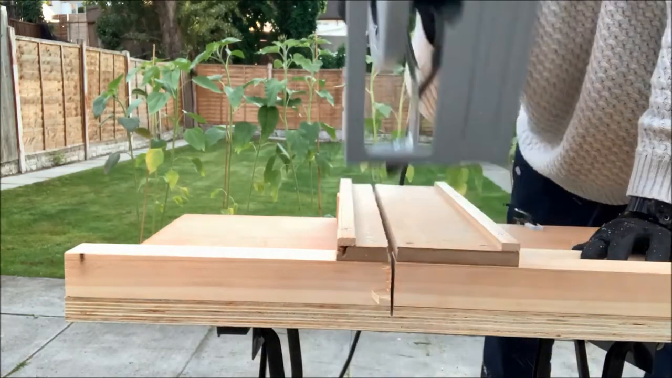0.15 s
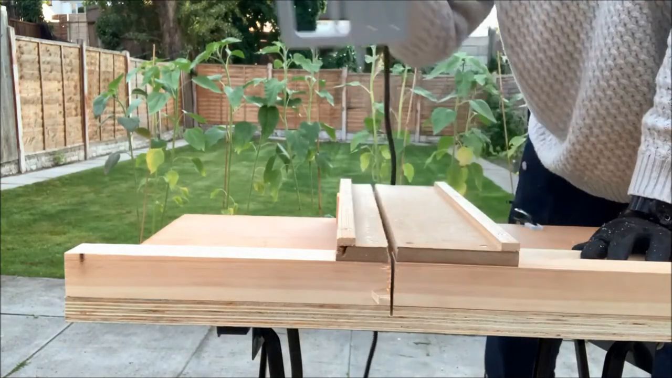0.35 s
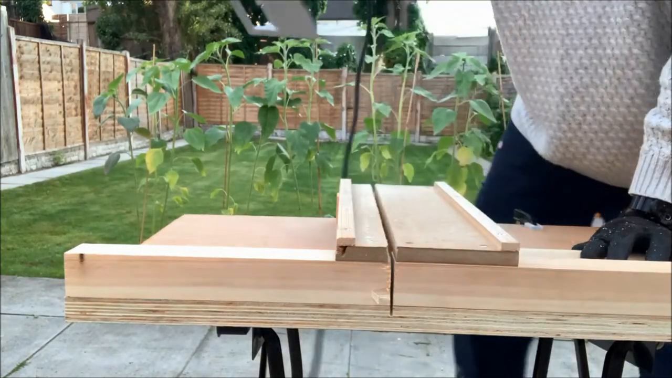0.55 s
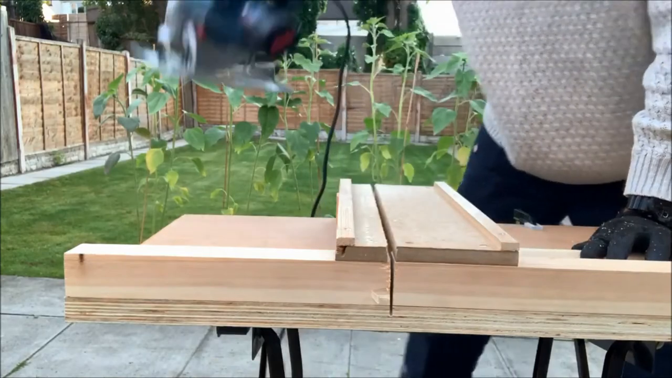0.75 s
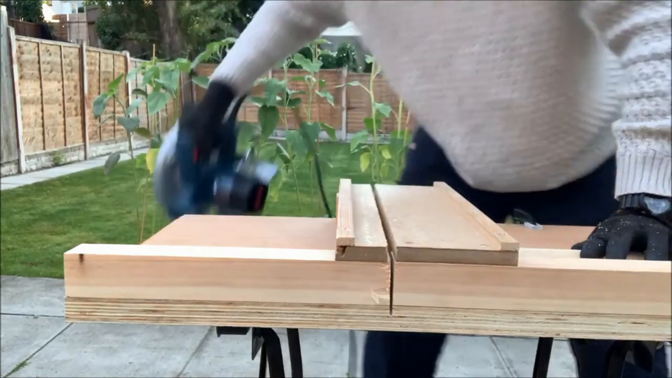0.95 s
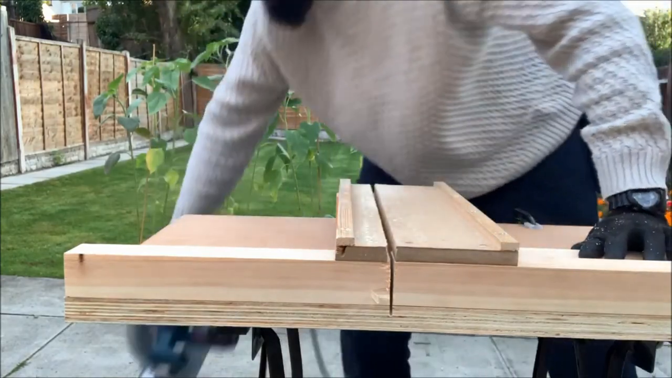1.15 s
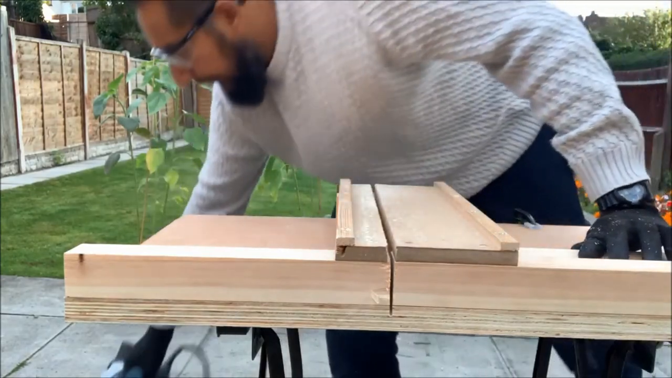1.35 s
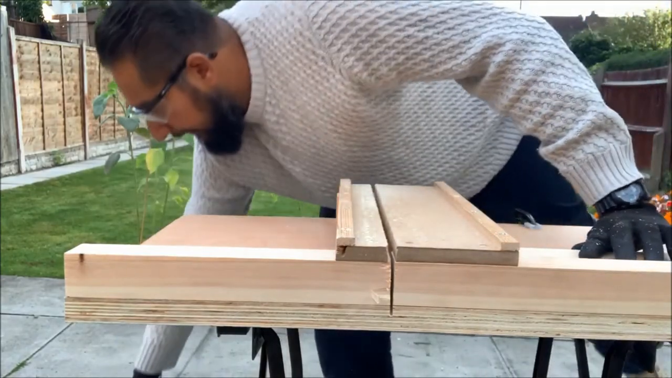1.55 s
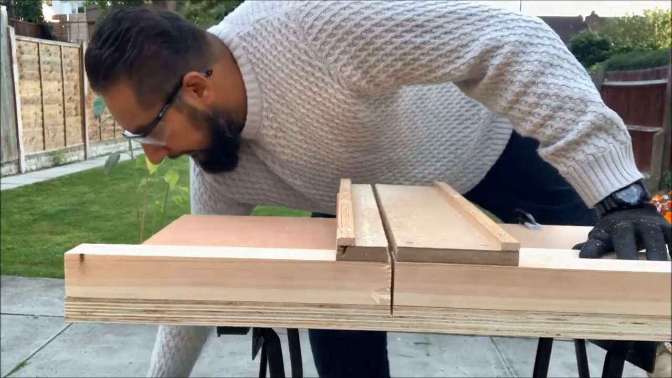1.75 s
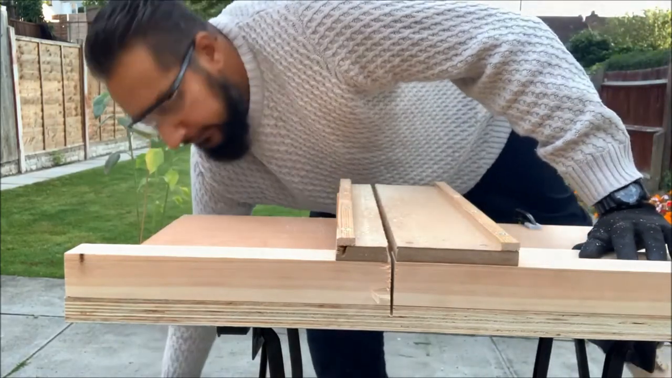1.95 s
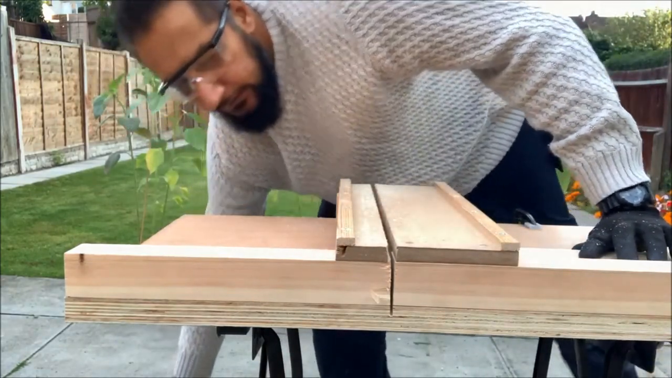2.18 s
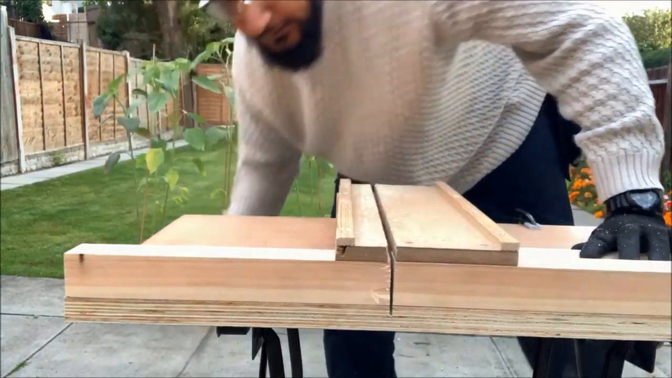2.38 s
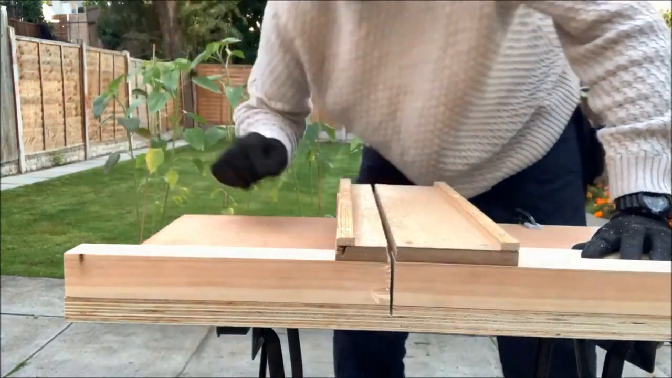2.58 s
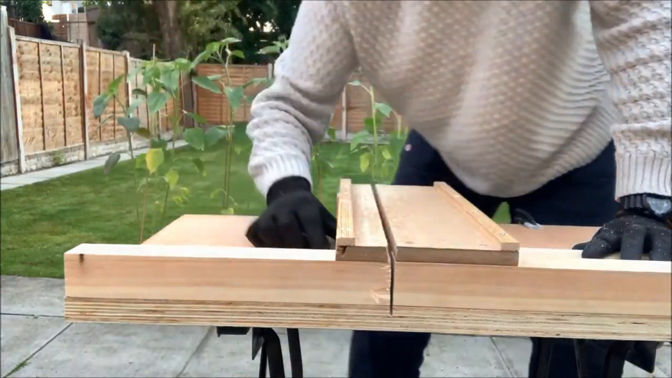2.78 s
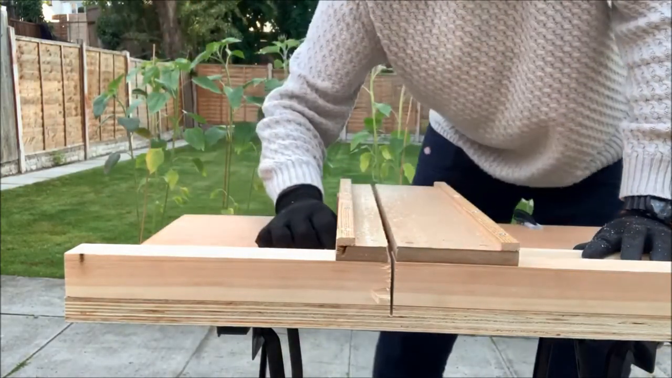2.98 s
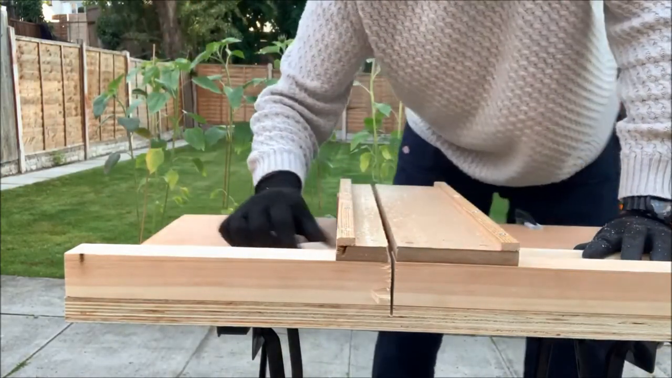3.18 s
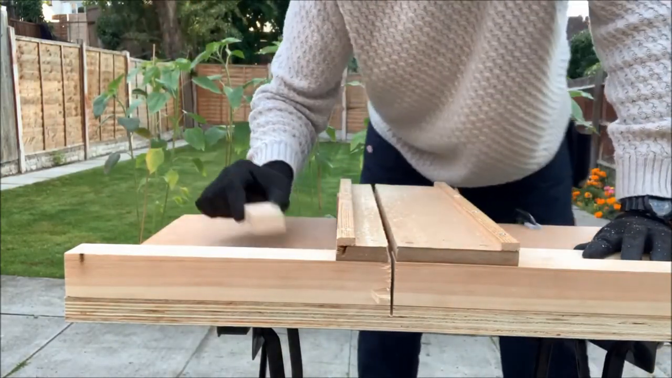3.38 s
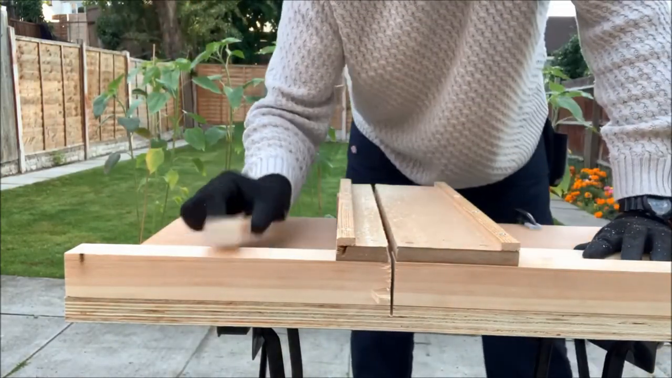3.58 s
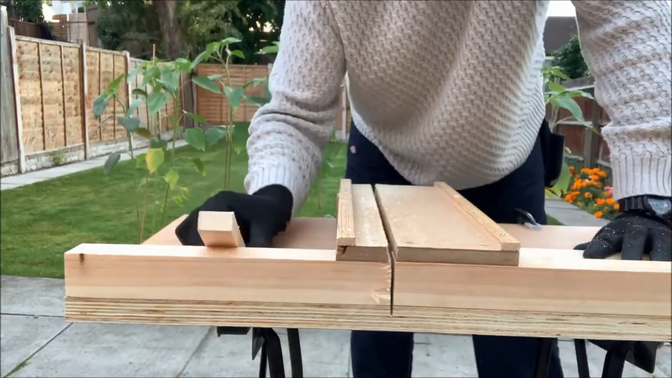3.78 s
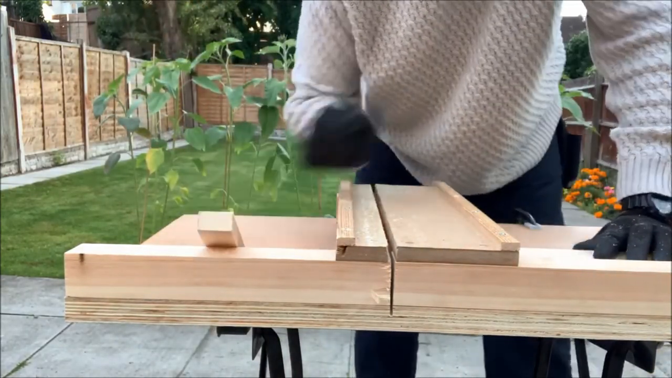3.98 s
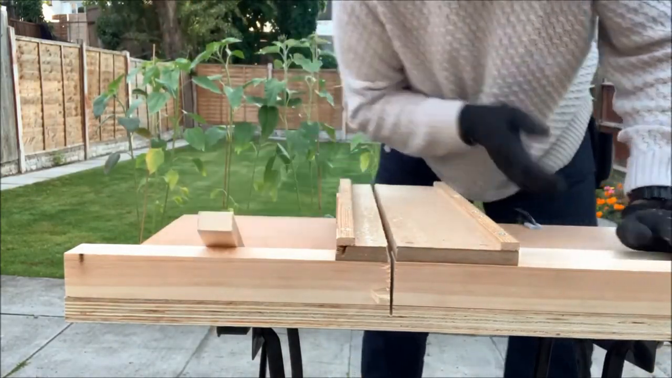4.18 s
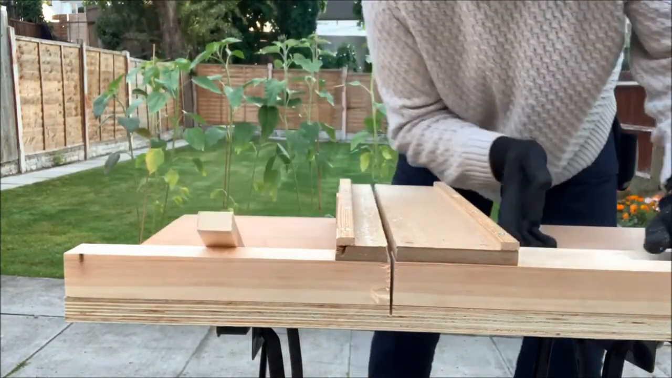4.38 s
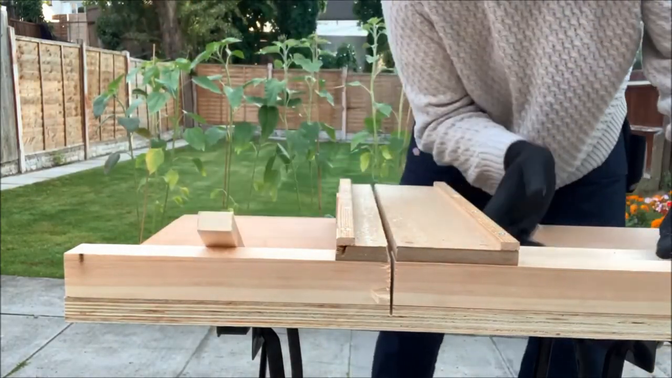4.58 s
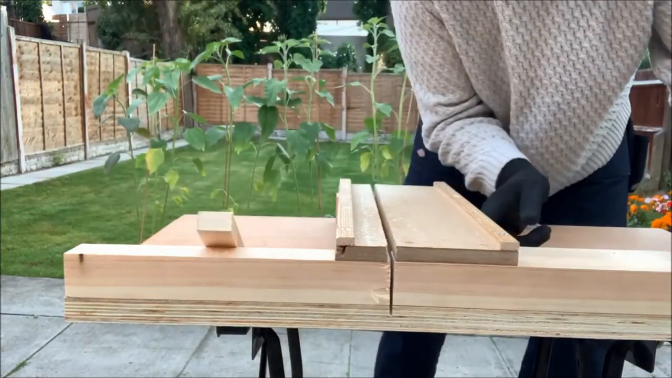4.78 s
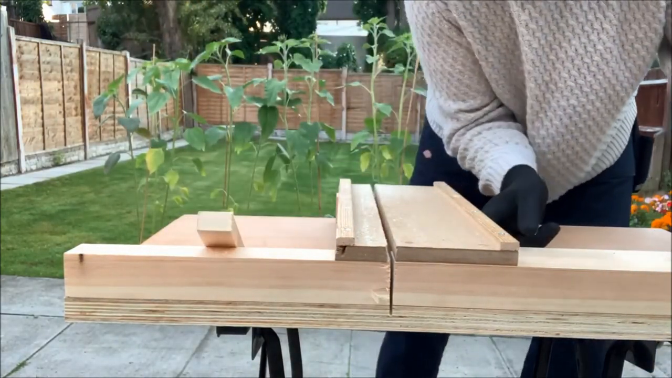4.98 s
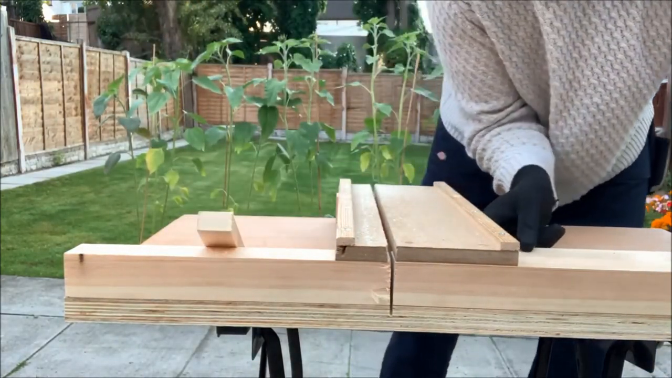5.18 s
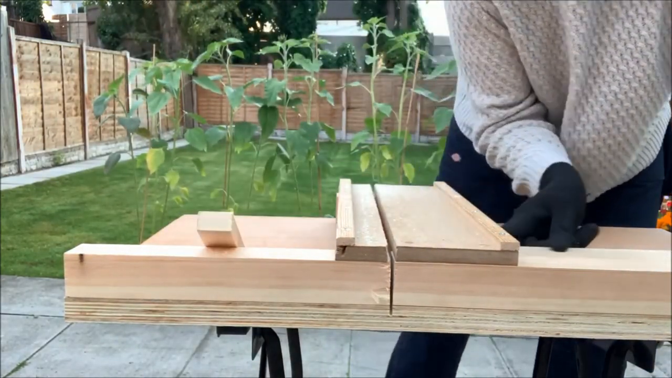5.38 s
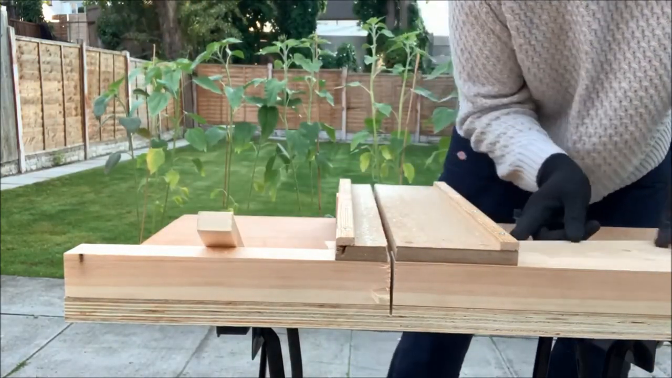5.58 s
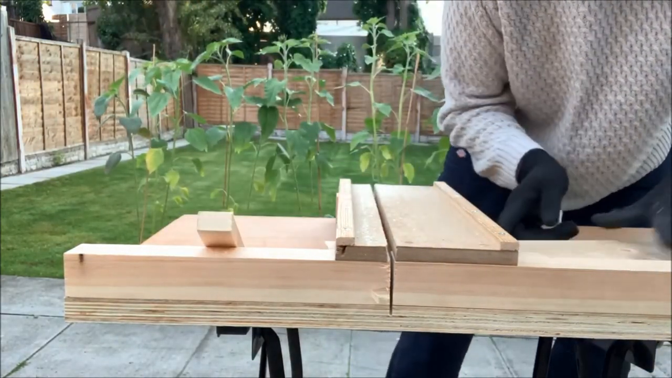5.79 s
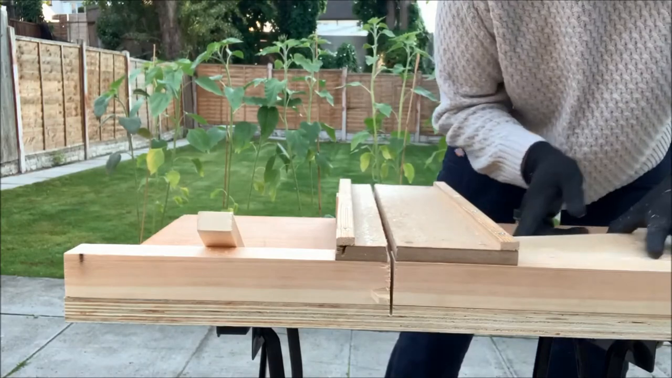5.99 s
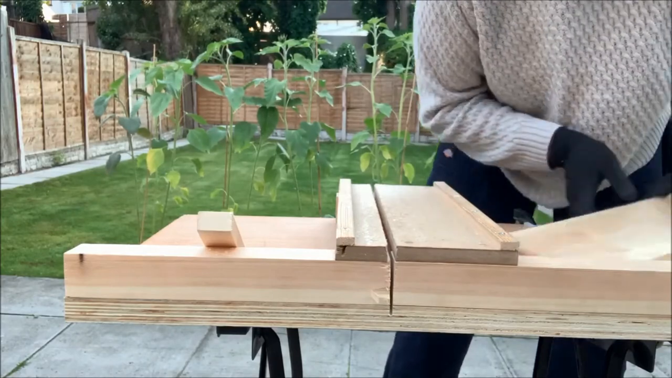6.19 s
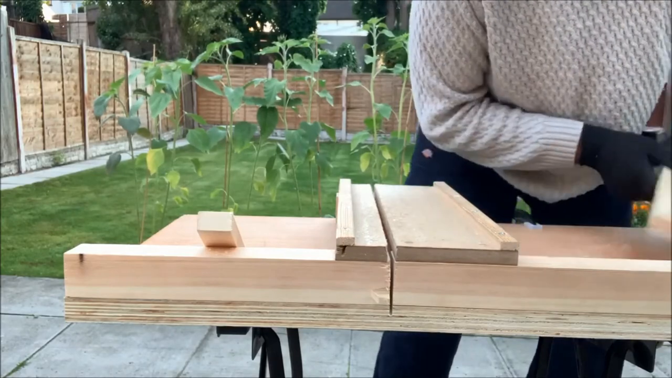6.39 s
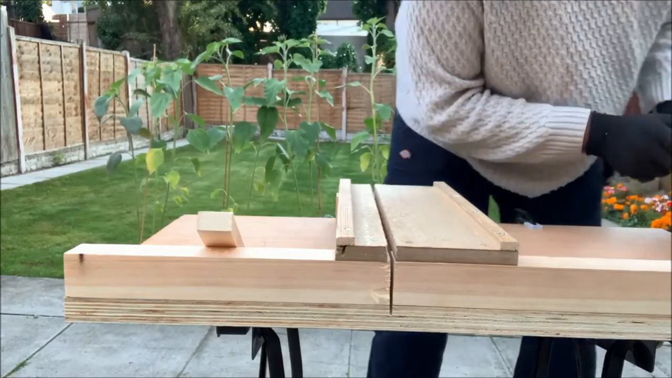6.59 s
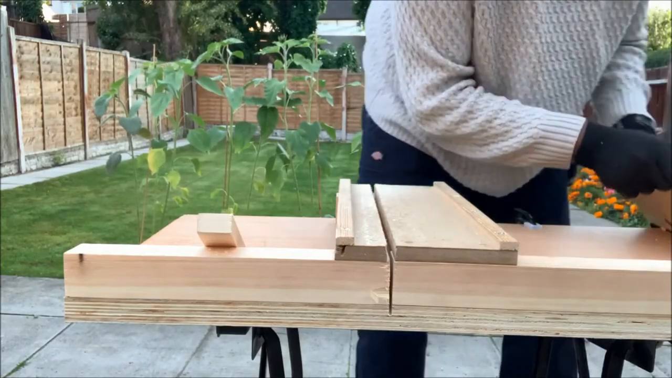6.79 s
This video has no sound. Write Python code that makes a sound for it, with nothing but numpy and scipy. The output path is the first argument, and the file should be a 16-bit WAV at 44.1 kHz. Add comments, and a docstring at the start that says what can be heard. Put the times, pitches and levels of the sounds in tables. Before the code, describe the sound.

A power saw spins down from a loud whine, clacks onto stone, leaves its blade faintly ringing, and sharp wood knocks follow outdoors.

```python
"""The roar and whine of a hand-held circular saw fall as it coasts to a stop in a garden.
It is set down on paving with clacks and thumps, and its blade sings on as beating, decaying disc modes.
Gloved hands brush over a bench as shaped noise; wood slides and knocks there as struck and rubbed modes.
A distant engine drones as a wavering tone over faint air; two microphone ports differ in lag, phase and level."""
import sys
import numpy as np
from scipy import signal
from scipy.fft import rfft, irfft
from scipy.io import wavfile
from scipy.ndimage import uniform_filter1d, map_coordinates

SR = 44100
rng = np.random.default_rng(int(sys.argv[2]) if len(sys.argv) > 2 else 0)


def wrap_up_sound(samples):
    """Save the sound to the file named by the first command line argument, as 16-bit audio."""
    columns = np.atleast_2d(samples).T
    # keep every value between -1 and 1, then stretch to whole-number steps
    tamed = np.clip(columns, -1, 1)
    steps = np.round(tamed * 32767).astype(np.int16)
    wavfile.write(sys.argv[1], SR, steps)


N = 302085
TIME = np.arange(N) / SR


def gain_of(db):
    """Decibel law: 20 dB is a tenfold amplitude."""
    return 10 ** (np.asarray(db) / 20)


def evened(x):
    """Normalization to unit rms."""
    return x / np.sqrt(np.mean(x ** 2) + 1e-20)


def read(points, hz):
    """Interpolation along a logarithmic frequency axis."""
    f, *values = np.transpose(points)
    return np.squeeze([np.interp(np.log(hz + 1), np.log(f + 1), v) for v in values])


def follow(rows, t):
    """Linear interpolation in time."""
    s, *columns = np.transpose(rows)
    return np.squeeze([np.interp(t, s, c) for c in columns])


def add(mix, s, sound):
    """Superposition of a sound that starts at s seconds."""
    part = mix[round(s * SR):][:len(sound)]
    part += sound[:len(part)]


def wander(hz):
    """Low-pass noise: a slow random fluctuation of rms 1."""
    noise = uniform_filter1d(rng.standard_normal(N), 200)
    return evened(signal.lfilter([1], [1, -np.exp(-2 * np.pi * hz / SR)], noise))


def frames():
    """Short-time analysis: frame times in seconds, 128 samples apart."""
    return np.arange(N // 128 + 5) * 128 / SR


def colour(points, peaks, hz):
    """Source-filter principle: gain of a smooth spectrum with resonances on top."""
    resonances = sum(gain_of(db) / (1 + (2 * (hz - f) / width) ** 2) for f, width, db in peaks)
    return gain_of(read(points, hz)) * (1 + resonances)


def hiss(points, level_db, bass_db, treble_db, patchy_db, peaks=()):
    """Filtered noise: patchy, with level, bass and treble given frame by frame."""
    hz = np.fft.rfftfreq(512, 1 / SR)
    a, b, patches = rng.standard_normal((len(level_db), 257, 3)).T
    patches = evened(uniform_filter1d(uniform_filter1d(patches, 6, 0), 10, 1))
    shape = colour(points, peaks, hz)
    low = 1 / (1 + (hz / 1100) ** 6)
    high = 1 / (1 + (8000 / (hz + 1)) ** 8)
    size = 0
    for weight, band_db in [(low, bass_db), (1 - low - high, 0), (high, treble_db)]:
        band = shape * weight
        size = size + (band / np.linalg.norm(band))[:, None] * gain_of(level_db + band_db)
    spectrum = (a + 1j * b) * size * gain_of(patchy_db * patches)
    return signal.istft(spectrum, nperseg=512, noverlap=384)[1][:N]


def fence(x):
    """Sparse reflection: a short thin tail thrown back by fences and walls."""
    t = np.arange(SR // 4) / SR
    echoes = rng.standard_normal(len(t)) * (rng.random(len(t)) < .05)
    tail = echoes * gain_of(-60 * t / 0.099) * (t > .008)
    tail = uniform_filter1d(tail, size=5)  # treble is scattered away
    return x + gain_of(-14) * signal.fftconvolve(x, tail / np.linalg.norm(tail))[:N]


# the two microphone ports: pitch_hz [Hz], swing [rad, before scatter], right_phase [rad],
# lag_share [share of the arrival lag], balance_db [left minus right, dB]
PORT_RESPONSE = [(302, 0.86, 0.66, 0.81, 3), (1487, 1.62, 0.083, 0.36, -1.6),
                 (4790, 1.41, -0.21, 0.55, -3.5), (5500, 2.03, -1.6, 0.018, -2.4),
                 (7000, 0.58, -1.82, 0, -0.5)]
# the treble, same columns: the right phase turns on to a full circle
PORT_RESPONSE += [(9000, .1, -3.14, 0, 0), (11500, .6, -4.9, 0, 0), (13200, .05, -6.28, 0, 0)]


def ports(x, lag, scatter, size=2):
    """Two-point reception: arrival lag, fixed phase twist, level balance and a phase that drifts with scattering."""
    hz, t, z = signal.stft(x, SR, nperseg=256)
    swing, twist, share, balance_db = read(PORT_RESPONSE, hz)[:, :, None]
    chance = rng.standard_normal(z.shape[::-1]).T
    drift = evened(uniform_filter1d(uniform_filter1d(chance, size=size, axis=0), size=12, axis=1))
    lag_phase = 2 * np.pi * hz[:, None] * share * follow(lag, t) / SR
    turn = np.exp(1j * (twist + scatter * swing * drift + lag_phase))
    pair = [z * gain_of(balance_db / 2), z * turn * gain_of(-balance_db / 2)]
    return signal.istft(np.array(pair), SR, nperseg=256)[1][:, :N]


# distant engine: start_s [s], level_db [dB]
ENGINE_LEVEL = [(0, -86), (.7, -71.5), (1.3, -129), (1.7, -68), (2.5, -83.5), (4.3, -73), (4.45, -68),
                (4.92, -62), (5.03, -79.5), (5.15, -61), (5.5, -66.5), (6.0, -62.5), (6.85, -60.5)]
# spectrum of the air: pitch_hz [Hz], level_db [dB per Hz, relative]
AIR_SPECTRUM = [(25, -18), (70, 1.5), (200, -5.5), (500, -15), (1000, -14.5), (4000, -30), (15800, -48.5)]
AIR_DB = -72


def garden():
    """Frequency and amplitude modulation: a wavering engine note near 60 Hz over faint air noise."""
    phase = 2 * np.pi * np.cumsum(60.2 + 2.2 * wander(5.6)) / SR
    note = np.sin(phase) * gain_of(3 * wander(5))
    noise = rng.standard_normal((2, N))
    linked = noise + 0.038 * noise[::-1]  # the ports share a little of the air
    air = irfft(rfft(linked) * gain_of(read(AIR_SPECTRUM, np.fft.rfftfreq(N, 1 / SR))), N)
    engine_db = follow(ENGINE_LEVEL, TIME) + [[1.5], [-1.5]]  # stronger on the left
    return gain_of(engine_db) * evened(note) + gain_of(AIR_DB) * evened(air)


RISE_SHARE = 0.41  # of a stroke's length
GRIT_DB = 1.5  # rms unevenness of rubbing
PATCHY_DB = .8  # rms patchiness of brushing and roar


def stroke_db(late, length):
    """Gaussian envelope: a stroke's length runs between the points 10 dB below its peak."""
    return -10 * (late / length / np.where(late < 0, RISE_SHARE, 1 - RISE_SHARE)) ** 2


# strokes of glove, sleeve, wood and saw shoe: peak_s [s], length_s [s], level_db [dB],
# bass_db [dB against the middle], treble_db [dB against the middle]
STROKES = [(1.863, 0.65, -66.5, 0, -12.5), (1.67, 0.038, -37, -17.5, -12), (2.2, 0.23, -66.5, -8, -3.5),
           (2.832, 0.21, -66.5, -9, 0), (3.086, 0.35, -84, 13, -12), (3.197, 0.17, -72.5, 3.5, -1),
           (3.686, 0.18, -77, 20.5, -44.5), (4.236, 0.36, -75.5, 2.5, -4.5), (4.393, 0.19, -70.5, 1, -7.5),
           (4.664, 0.53, -76.5, 0.5, -8), (5.27, 0.27, -78, 5.5, -3.5), (5.453, .16, -55, -0.5, -9.5),
           (6.036, 0.34, -62, 5, -11.5), (6.184, 1, -83, 18, -29), (6.631, 0.086, -73.5, 6, -2.5),
           (6.759, 0.098, -54.5, 10, -7)]
# spectrum of brushing: pitch_hz [Hz], level_db [dB per Hz, relative]
GLOVE_SPECTRUM = [(88, -42), (150, 3.5), (512, -2.5), (673, -8.5), (2080, 12), (4800, 8), (10100, -18),
                  (15800, -22)]


def hands():
    """Friction noise: strokes swell and fade, and their powers add up in bass, middle and treble."""
    s, length, db, bass_db, treble_db = np.transpose(STROKES)[:, :, None]
    late = frames() - s
    grit_db = GRIT_DB * evened(uniform_filter1d(rng.standard_normal(late.shape[1]), size=3))
    swell_db = db + grit_db + stroke_db(late, length)
    low, mid, high = (10 * np.log10((gain_of(swell_db + d) ** 2).sum(0) + 1e-14)
                      for d in (bass_db, 0, treble_db))
    return hiss(GLOVE_SPECTRUM, mid, low - mid, high - mid, PATCHY_DB)


# wood sliding on wood: peak_s [s], length_s [s], level_db [dB], ring_hz [Hz]
WOOD_SLIDES = [(3.73, 0.2, -65, 1965), (6.155, 0.17, -61, 1210)]
# resonances of the sliding wood: multiple [of ring_hz], width_hz [Hz], level_db [dB]
SLIDE_MODES = [(.81, 120, -6), (1, 130, 0), (1.92, 70, -9)]


def slides():
    """Friction-driven resonance: uneven rubbing excites a few wooden modes while a piece slides."""
    out = np.zeros(N)
    for s, length, db, ring_hz in WOOD_SLIDES:
        rub = rng.standard_normal(N) * gain_of(GRIT_DB * wander(40))
        ring = np.zeros(N)
        for multiple, width, mode_db in SLIDE_MODES:
            hz = multiple * ring_hz
            resonance = signal.iirpeak(hz, hz / width, SR)
            ring += gain_of(mode_db) * evened(signal.lfilter(*resonance, rub))
        out += ring * gain_of(db + stroke_db(TIME - s, length))
    return out


BLOW_RISE_S = .0005  # times the softness of a blow
SOFTER_DB = -14  # each such step of crack level slows the rise and narrows the ring once more
DETUNE = .012  # rms share by which each mode strays from blow to blow


def hits(rows, modes, crack_t60, narrow_db):
    """Modal impact: each blow favours the modes near one pitch, over a decaying crack of noise."""
    out, t = np.zeros(N), np.arange(SR // 3) / SR
    hz, mode_db, t60 = np.transpose(modes)[:, :, None]
    for s, db, favoured_hz, crack_db in rows:
        chance = rng.standard_normal(len(t) + len(modes))
        soft = 2.0 + abs(crack_db / SOFTER_DB)
        detune = 1 + DETUNE * chance[:len(modes), None]
        favour_db = -narrow_db * soft * np.log2(hz / favoured_hz) ** 2
        ring = gain_of(mode_db + favour_db - 60 * t / t60) * np.sin(2 * np.pi * hz * detune * t)
        ring = ring.sum(0)
        dull = np.exp(-2 * np.pi * 1.7 * favoured_hz / SR)  # a low-pitched blow has a dull crack
        noise = signal.lfilter([1, -1], np.convolve([1, -dull], [1, -.96]), chance[len(modes):])
        crack = 0.26 * evened(noise) * gain_of(crack_db - 60 * t / crack_t60)
        rise = np.minimum(t / BLOW_RISE_S / soft, 1)
        add(out, s, gain_of(db) * (ring / abs(ring).max() + crack) * rise)
    return out


# wood on the bench: start_s [s], level_db [dB], favoured_hz [Hz],
# crack_db [dB against a base crack of 0.26 rms to a ring peak of 1]
WOOD_BLOWS = [(2.562, -38.5, 360, -11), (3.0, -48.5, 660, -27.5), (3.256, -47, 693, -22),
              (3.6152, -13, 1336, -7.5), (3.622, -26, 335, -55), (3.706, -28.5, 950, -30),
              (6.058, -43, 333.6, -21), (6.1065, -21.5, 1260, -40), (6.112, -43.5, 277, -36),
              (6.723, -13.5, 600, -10), (6.731, -18, 193, 1), (6.746, -50, 230, -14),
              (6.766, -35, 263, -10), (6.785, -36.5, 200, -25), (6.805, -47, 300, -24)]
# modes of bench and wood: pitch_hz [Hz], level_db [dB], t60_s [s]
BENCH_MODES = [(150, -5, 0.21), (192, 10, 0.092), (335, 7, 0.042), (520, 4.5, 0.037), (783, 5, 0.034),
               (1054, 9, 0.016), (1610, 10.5, 0.011), (1980, 4, 0.029), (2493, 9.5, 0.021),
               (3410, 19.5, 0.01), (4620, 32, 0.0095), (5850, 30, 0.012)]


def knocks():
    """Damped modal vibration: wood strikes the bench, and the blows echo."""
    return fence(hits(WOOD_BLOWS, BENCH_MODES, 0.016, 3.5))


# soft bumps: start_s [s], level_db [dB, before a pulse that peaks at 1.6 times], pitch_hz [Hz]
SOFT_BUMPS = [(0.618, -50, 68), (0.839, -48.5, 75.5), (1.737, -52, 119), (2.187, -48, 150),
              (3.323, -58, 60.2), (6.067, -47.5, 187.5)]


def thumps():
    """Heavily damped oscillation: short low pushes."""
    out, t = np.zeros(N), np.arange(SR // 10) / SR
    pulse = t / 0.0019 * np.exp(1 - t / 0.0031)
    for s, db, hz in SOFT_BUMPS:
        add(out, s, gain_of(db) * np.sin(2 * np.pi * hz * t) * pulse)
    return out


# saw on paving, guard snapping: start_s [s], level_db [dB], favoured_hz [Hz],
# crack_db [dB against a base crack of 0.26 rms to a ring peak of 1]
SAW_BLOWS = [(.106, -18.5, 3100, 0), (1.649, -21, 3440, -13), (1.6745, -17, 2280, -9.5),
             (1.726, -33, 3680, -2.5), (2.074, -30, 1200, -12.5), (2.187, -27.5, 1120, -9.5)]
# modes of the saw's shoe: pitch_hz [Hz], level_db [dB], t60_s [s]
SHOE_MODES = [(633, 1.5, 0.04), (1223, 8.5, 0.03), (1510, -1.5, 0.047), (2181, 3.5, 0.081), (2850, 0, 0.03),
              (3440, 1, 0.024), (4575, -2.5, 0.0335), (7600, -5.5, 0.03)]


def clacks():
    """Damped modal vibration: saw meets paving or its guard snaps, and the blows echo."""
    return fence(hits(SAW_BLOWS, SHOE_MODES, 0.14, 7.7))


# bearing friction [turns per s2], fan drag [per turn], time of the stop [s]
FRICTION, DRAG, STOP_S = 18.5, .0045, 2.222
GEAR = 4.8  # motor turns to a blade turn


def coasting(t):
    """Deceleration law: blade turns a second under steady friction plus drag as the square of speed."""
    return np.sqrt(FRICTION / DRAG) * np.tan(np.sqrt(FRICTION * DRAG) * np.maximum(STOP_S - t, 0))


# while spinning: wave levels in dB as (near rest, change at full speed); tilt to high modes, dB an octave
FORWARD_DB, BACKWARD_DB, TILT_DB = (2, 6), (8, -63), -9.5
STIFFENING = .27  # of (nodes times speed) squared over pitch, in Hz
FLARE_ORDERS, FLARE_NODES = (7, 14, 15), 4  # whines that shake this mode as they sweep across it
FLARE_DB, FLARE_WIDTH_HZ = 15, 32
HUSH_S = 6.5  # the last of the ring drops 12 dB from here, within 50 ms
# modes of the disc at rest: pitch_hz [Hz], nodes [nodal diameters]
DISC_MODES = [(1253.5, 4), (1732.8, 5), (829, 3), (3725, 2), (3582, 5)]
# their ringing, row by row: level_db [dB at the stop], t60_s [s], beat_hz [about, at rest, Hz],
# null_s [time of a beat null, s], spun_db [gained at full speed, dB]
DISC_RINGING = [(-60.5, 13.4, .54, 2.938, -6.5), (-66, 12.8, 0.92, 3.248, 23), (-85.5, 26, .4, 2.2, -17.5),
                (-82.5, 11.4, 0.83, 3.3, 51), (-76.5, 2.6, 1, 2.6, 51.5)]


def blade():
    """Rotational mode splitting: spin parts forward and backward waves; at rest they merge and beat slowly."""
    speed, out = coasting(TIME), np.zeros(N)
    pace, turning = speed / speed[0], np.clip(speed / 3, 0, 1)
    forward_db, backward_db = ((slow + fast * pace ** 2) * turning for slow, fast in (FORWARD_DB, BACKWARD_DB))
    waves = ((0.89, forward_db, 1), (-1.1, backward_db, 0.66))
    for (hz, nodes), (db, t60, beat, null, spun_db) in zip(DISC_MODES, DISC_RINGING):
        centre = np.cumsum(hz + STIFFENING * (nodes * speed) ** 2 / hz) / SR  # spin stiffens the disc
        split = np.cumsum(np.hypot(nodes * speed, beat / 2)) / SR
        split -= split[round(null * SR)]  # the waves oppose each other at the null
        level_db = db - 60 * np.maximum(TIME - STOP_S, 0) / t60
        level_db += (TILT_DB * np.log2(hz / 1250) + spun_db * pace) * turning
        level_db -= 12 * np.clip((TIME - HUSH_S) * 20, 0, 1)
        for side, wave_db, share in waves:
            shaken_db = 4.5 * wander(12) * np.clip(speed / 20, 0, 1)  # the motor keeps jolting the disc
            if nodes == FLARE_NODES and side > 0:
                for order in FLARE_ORDERS:
                    apart_hz = order * GEAR * speed - hz - side * nodes * speed
                    shaken_db += FLARE_DB / (1 + (apart_hz / FLARE_WIDTH_HZ) ** 2)
            wave = np.sin(2 * np.pi * (centre + side * split))
            out += side * share * gain_of(level_db + wave_db + shaken_db) * wave
    return out


RATTLE_ORDERS, RATTLE_DB = (12, 64), -14  # lowest and highest multiple of motor speed; level setting
RATTLE_TURNS = 30  # turns over which it renews itself
SCREECH_S, SCREECH_WIDTH_S, SCREECH_DB = .71, .08, 9  # the rattle briefly rises to a screech
# spectrum of the housing: pitch_hz [Hz], level_db [dB per Hz, relative]
HOUSING_SPECTRUM = [(88, -74.5), (150, -19), (1360, -5.5), (1930, -7.5), (5520, -8.5), (9160, -17.5),
                    (14300, -18.5), (15800, -37)]
# resonances of the casing: pitch_hz [Hz], width_hz [Hz], level_db [dB over the housing spectrum]
CASING_MODES = [(610, 110, 4), (1341, 49.4, 12.5), (3475, 390, 2), (4706, 83, -12.5), (5540, 49, 0.5)]


def rattle(turns, speed):
    """Near-periodicity: brushes and bearings almost repeat each turn, as faint parallel glides that come and go."""
    whole, order = np.arange(int(turns[-1]) + 2), np.arange(513)
    chance = rng.standard_normal((len(whole), 513, 2))
    a, b = uniform_filter1d(chance, RATTLE_TURNS, axis=0).T * np.sqrt(RATTLE_TURNS / 2)
    heard = (order >= RATTLE_ORDERS[0]) & (order <= RATTLE_ORDERS[1])
    hz = order[:, None] * np.interp(whole, turns, speed)
    size = colour(HOUSING_SPECTRUM, CASING_MODES, hz) * heard[:, None]
    shapes = irfft((a + 1j * b) * size, axis=0) * 512  # one waveform a turn
    screech_db = SCREECH_DB * np.exp(-((TIME - SCREECH_S) / SCREECH_WIDTH_S) ** 2)
    return gain_of(RATTLE_DB + screech_db) * map_coordinates(shapes, [turns % 1 * 1023, turns], order=1)


# the bass of the roar thins as speed is lost; past HIDDEN_S the bench screens the treble
ROAR_BASS_DB, BASS_LOSS_DB, ROAR_TREBLE_DB = -6.5, -27.5, -8.5
HIDDEN_S, TREBLE_LOSS_DB_PER_S = 0.89, -16.5
MESH_BASS_SHARE = .5  # share of the roar's bass level, in dB, that low tones take on


def bass_of_roar(t):
    """Speed dependence of fan noise: bass against the middle of the roar, dB."""
    return ROAR_BASS_DB + BASS_LOSS_DB * (1 - coasting(t) / coasting(0))


def whine(rows, turns, speed, low_db):
    """Order tones: fluttering pitches locked to the slowing shaft flare as they cross a resonance."""
    out = np.zeros(N)
    for order, db in rows:
        hz = order * speed
        level_db = db + FLUTTER_DB * wander(FLUTTER_HZ) + low_db / (1 + (hz / 1100) ** 6)
        tone = np.sin(2 * np.pi * order * turns + 0.24 * wander(FLUTTER_HZ))
        out += colour(HOUSING_SPECTRUM, CASING_MODES, hz) * gain_of(level_db) * tone
    return out


# the vane whine peaks as the vents swing past the ports; it is 10 dB down a width away
FACING_S, FACING_WIDTH_S, WHINE_GAIN_DB = .85, .62, 5
FLUTTER_DB, FLUTTER_HZ = 3, 16  # rms depth and corner pitch of the flutter
# fan and brush roar: start_s [s], level_db [dB]
ROAR_LEVEL = [(0, -35), (.3, -37.5), (.55, -42.5), (.72, -43.5), (.98, -48.5), (1.25, -47), (1.7, -50.5),
              (2.0, -67.5), (2.25, -79), (2.6, -120)]
# pinion teeth and gear mesh: order [multiple of motor speed], level_db [dB against the roar, before colour]
MESH_TONES = [(7, -10), (14, -14)]
# fan vanes and commutator bars, same columns
VANE_TONES = [(24, -5), (34, -13), (48, -4), (96, -9)]


def motor(pulsing):
    """Aerodynamic and gear noise: roar through the housing, whines locked to the shaft, and rattle."""
    speed = GEAR * coasting(TIME)
    turns = np.cumsum(speed) / SR
    low_db = MESH_BASS_SHARE * bass_of_roar(TIME)
    mesh = whine(MESH_TONES, turns, speed, low_db)
    vanes = whine(VANE_TONES, turns, speed, low_db)
    facing_db = WHINE_GAIN_DB - 10 * ((TIME - FACING_S) / FACING_WIDTH_S) ** 2
    tones = (mesh + vanes * gain_of(facing_db)) * pulsing
    t = frames()
    treble_db = ROAR_TREBLE_DB + TREBLE_LOSS_DB_PER_S * np.maximum(t - HIDDEN_S, 0)
    roar = hiss(HOUSING_SPECTRUM, follow(ROAR_LEVEL, t), bass_of_roar(t), treble_db, PATCHY_DB, CASING_MODES)
    return roar + (tones + rattle(turns, speed)) * gain_of(follow(ROAR_LEVEL, TIME))


# the tones pulse about 13 times a second for roughly half a second
PULSING_S, PULSING_WIDTH_S, PULSING_HZ, PULSING_DB = 1.165, .3, 13, 5
# arrival from the bench: start_s [s], lag [left port behind right, samples, before lag_share]
BENCH_LAG = [(2.2, 5.4), (3.9, 7.8), (4.2, 25)]
# arrival from the saw, same columns
SAW_ARRIVAL = [(0, 14), (1.1, -4), (2.2, -5.5)]


def scene():
    """Superposition: garden, bench and saw, the last two sent through both ports."""
    bench = ports(hands() + slides(), BENCH_LAG, 0.88) + ports(knocks(), BENCH_LAG, 0.63, size=8)
    span = np.exp(-((TIME - PULSING_S) / PULSING_WIDTH_S) ** 4)
    pulsing = gain_of(PULSING_DB * np.cos(2 * np.pi * PULSING_HZ * (TIME - PULSING_S)) * span)
    saw = ports(clacks() + thumps(), SAW_ARRIVAL, 0.92, size=8)
    saw += ports(blade() * pulsing, SAW_ARRIVAL, .06)
    saw += ports(motor(pulsing), SAW_ARRIVAL, 0.74)
    return garden() + bench + saw


EDGE_HZ, RUMBLE_HZ = 15900, 42


def record(dry):
    """Band-pass filtering: the microphone loses the deepest bass, then the band limit takes the top."""
    high_pass = signal.butter(3, RUMBLE_HZ, "high", fs=SR, output="sos")
    thinned = signal.sosfilt(high_pass, dry)
    band_limit = signal.firwin(511, EDGE_HZ, window=("kaiser", 9), fs=SR)
    return signal.oaconvolve(thinned, band_limit[None], "same")


dry = scene()
out = record(dry)
wrap_up_sound(out)
```